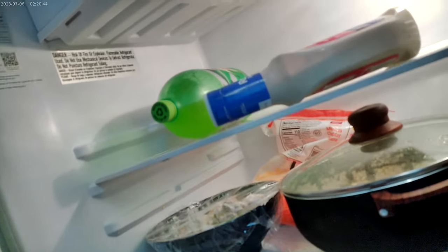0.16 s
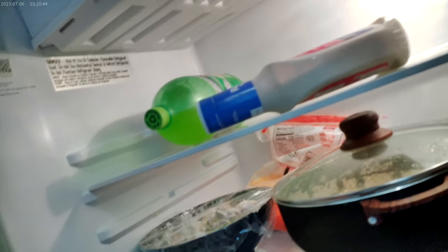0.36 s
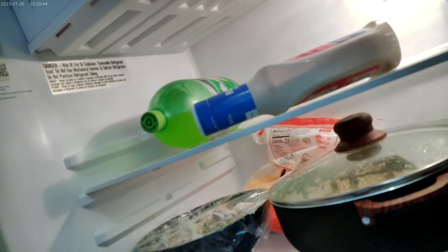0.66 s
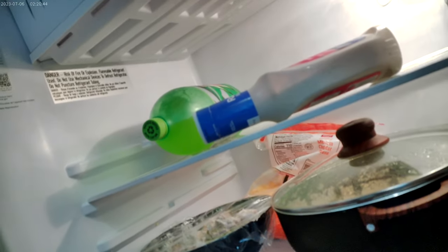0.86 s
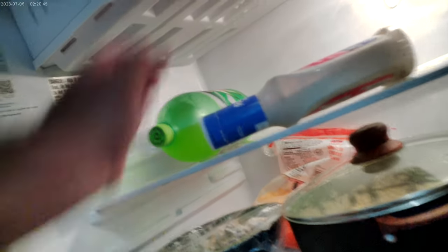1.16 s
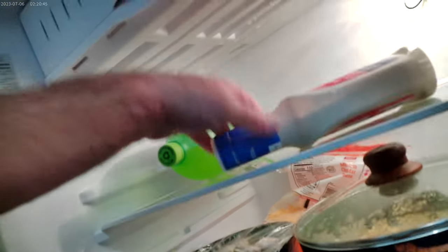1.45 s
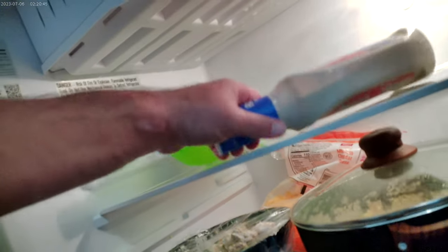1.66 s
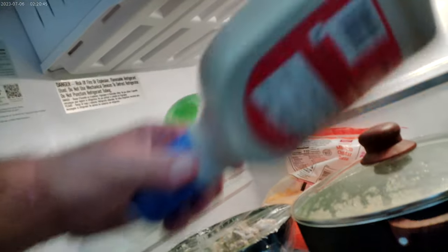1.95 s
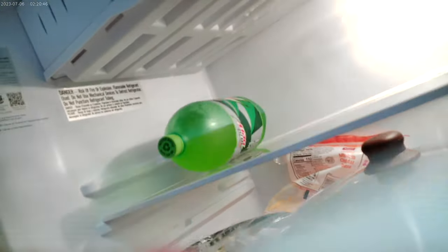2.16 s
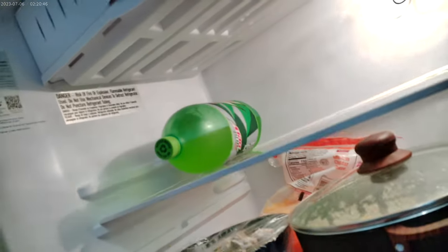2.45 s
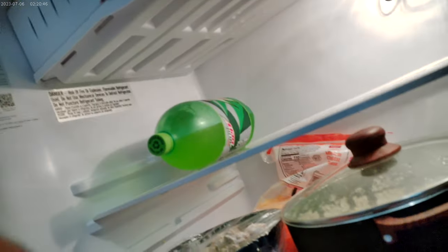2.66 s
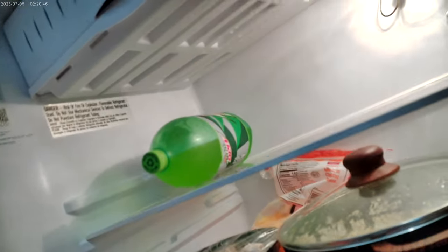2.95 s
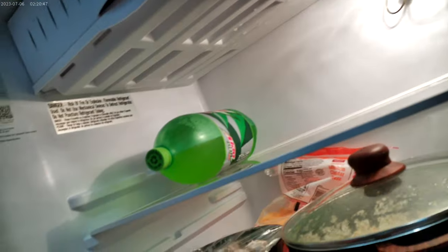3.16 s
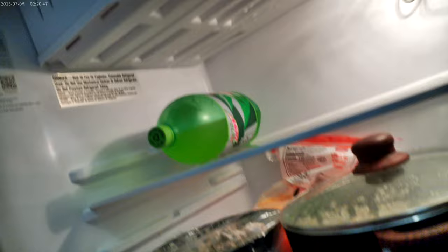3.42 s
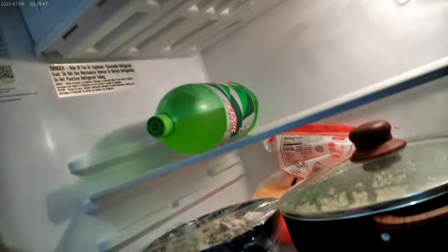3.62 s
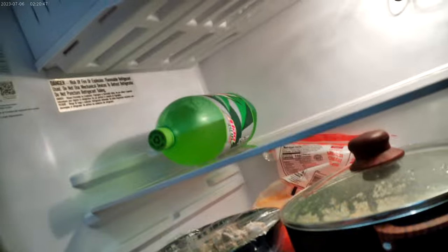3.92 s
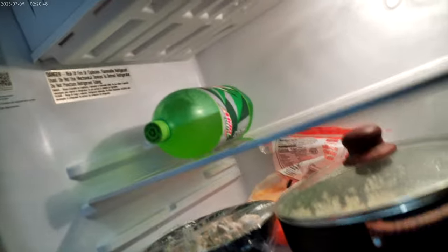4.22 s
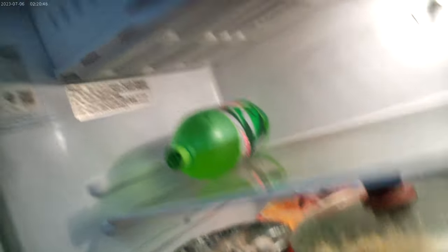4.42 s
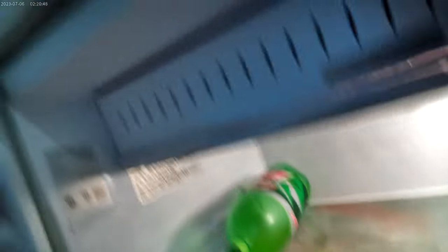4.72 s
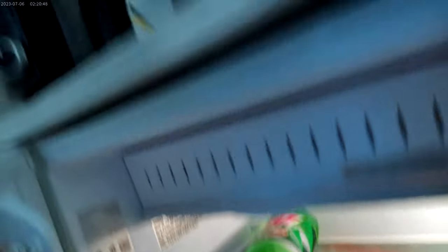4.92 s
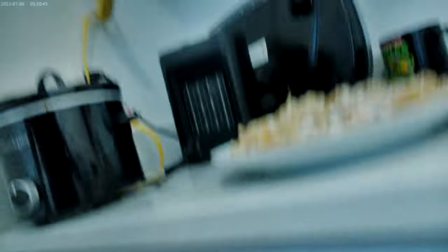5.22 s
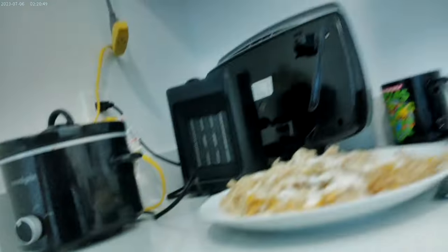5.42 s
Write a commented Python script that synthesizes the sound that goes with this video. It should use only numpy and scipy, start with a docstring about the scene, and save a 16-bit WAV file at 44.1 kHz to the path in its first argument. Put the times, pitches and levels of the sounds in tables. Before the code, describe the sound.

Heard closely from inside an open refrigerator, with a short boxy echo. At 0 s a dull, low bottle knock lands with a brief swell of rumble and fades by about 0.3 s. Very faint taps come near 0.9-1.0 s, and barely audible plastic ticks and a soft touch around 1.8-1.9 s. At 2.6 s a firm hollow clunk breaks the quiet, followed by two quick knocks near 2.9 s. The heaviest blows come at 3.0-3.1 s, thick and bouncing, slightly flattened by the small microphone. Softer thuds follow at 3.45-3.6 s, then rolling bumps at 3.65-3.9 s with low rumble, mid-range rustle and a faint glassy lid chatter. A tight cluster of strong knocks strikes at 4.27-4.35 s, with a faint tap near 4.5 s. After that only low rumble and an almost inaudible wavering hum remain, with one tiny click at the very end, about 5.6 s.

```python
"""Knocks inside an open refrigerator

Bottles knock and bounce on the shelves: bursts of contact force excite damped modes of bottle, shelf and
cabinet walls. A glass pot lid chatters on its metal rim in dense clusters of high modes, and plastic ticks
are bursts in broad bands. Decaying noise gives the echo of cabinet and kitchen; faint filtered noise and
a wavering hum fill the gaps. A small microphone overloads softly on the heaviest blow.
"""
import sys
import numpy as np
from scipy import signal
from scipy.fft import rfft, irfft
from scipy.io import wavfile
from scipy.ndimage import uniform_filter1d

SR = 44100
rng = np.random.default_rng(int(sys.argv[2]) if len(sys.argv) > 2 else 0)


def output_pcm(signal):
    """Save a mono or channel-first signal as 16-bit PCM at the path in sys.argv[1].

    Samples are clipped to [-1, 1] before scaling.
    """
    pcm = np.clip(np.atleast_2d(signal).T, -1, 1) * 32767
    wavfile.write(sys.argv[1], SR, np.round(pcm).astype(np.int16))


N = 246078  # samples in the scene

# Bottle blows. Each row: start in seconds, relative level in dB, bottle pitch in Hz, note in dB, thud pitch
# in Hz, thud in dB, clack in dB, crack in dB, contact time in seconds, mean loss per rebound in dB.
BOTTLE_BLOWS = [(0.002, -15, 215, -6, 203, -3, -8, -45, 0.0073, 14),
                (0.212, -56, 280, -18, 110, 12, -6.5, -47, 0.012, 14),
                (0.88, -35, 773, -9.5, 280, -36, -2.5, -49, 0.0053, 23.5),
                (0.945, -46, 337, -15, 250, -20, -18, -56, 0.027, 2),
                (1.009, -49.5, 830, -9, 230, 2.5, -41, -67, 0.018, 8.5),
                (1.93, -62.5, 455, -9, 150, 6.5, -6, -39, 0.032, 2.5),
                (2.589, -38, 600, -10.5, 143, -7, -30.5, -64, 0.014, 18.5),
                (2.607, -6, 748, -11, 260, -5.5, -20.5, -49.5, 0.0077, 12.5),
                (2.853, -15, 745, -9.5, 125, -14.5, -5.5, -47.5, 0.011, 10),
                (2.877, -19.5, 833, -9.5, 135, -2, -13.5, -46.5, 0.016, 7),
                (3.032, -9, 558, -11.5, 200, -12, -22.5, -44.5, .03, 0.5),
                (3.055, 0, 283, -6.5, 226.7, -3.5, -17.5, -43, 0.017, 6),
                (3.096, -5, 678, -9.5, 165, -10.5, -11, -45, 0.015, 7.5),
                (3.445, -22.5, 800, -18, 213, 4, -29, -61, 0.0086, 17),
                (3.488, -26, 275, -14.5, 196, 3.5, -24.5, -59, .02, 5.5),
                (3.568, -35.5, 860, -7, 207, -8, -16, -62, 0.014, 11),
                (3.665, -13.5, 699, -5, 258, -24.5, -26, -62.5, 0.022, 8.5),
                (3.706, -15, 290, -1, 272, -9.5, -29.5, -68.5, 0.024, 4),
                (3.799, -31.5, 260, -18.5, 90, 3.5, -4, -78, 0.026, 5.5),
                (3.866, -23, 798, -14, 221, -8, -14.5, -58, 0.015, 5.5),
                (4.27, -11, 759, -12.5, 242, -13, -4, -38, 0.011, 10.5),
                (4.287, -8.5, 706, -13.5, 105, -5, -19.5, -57, 0.012, 8),
                (4.321, -18, 753, -15.5, 210, -1, -13, -42, 0.017, 7.5),
                (4.471, -40, 621, -11.5, 200, -8.5, -34, -36.5, 0.01, 15.5),
                (5.565, -51, 755, -11, 245, -33, 1, -45, 0.0052, 26)]
# Lid meeting the rim. Each row: start in seconds, relative level in dB, level of the chatter against it in dB.
LID_TOUCHES = [(3.6674, -25, -27), (3.692, -23, -15), (3.868, -37, -21)]
# Dry plastic ticks. Each row: start in seconds, relative level in dB, favoured pitch in Hz, length in seconds.
PLASTIC_TICKS = [(0.877, -89, 4300, .02), (1.789, -64, 5070, 0.018), (1.846, -70, 5600, 0.007),
                 (3.448, -60, 3180, 0.0065), (3.503, -51, 2050, 0.0046), (4.47, -46, 1700, 0.015),
                 (4.487, -47, 2400, 0.0065)]
# Modes of the shelf, cabinet walls, glass lid and hard plastic edges. Each row: frequency in Hz,
# relative level in dB, nominal 60 dB decay time in seconds, which ring() scales by its damp factor.
SHELF_MODES = [(317, 7.5, 0.47), (410, -4, 0.29), (467, 4, 0.91), (518.2, -2.5, 0.2), (506, -7.5, 0.21),
               (582.4, 8, 0.41), (634, 3.5, 0.27), (795.6, 11.5, 0.34), (870, -2.5, 0.69),
               (1010, -11, 0.41)]
WALL_MODES = [(58, -36.5, 0.32), (76.9, -6, 0.26), (114, -10.5, 0.75), (139, -15, 0.09), (160, 5, 0.13),
              (199.2, 11.5, 0.25), (241.7, 11.5, 0.14), (277.8, -4, 0.2)]
LID_MODES = [(1457, 14.5, 0.092), (1550, -3.5, .15), (2320, -29.5, .2), (2450, -14.5, 0.21),
             (2534, 9.5, 0.092), (2870, 3, 0.11), (3010, -3.5, 0.58), (3276, -3.5, 0.19), (3460, -4, 0.085),
             (4350, -18.5, .2), (4377, 2, 0.18), (4680, 17.5, 0.3), (4670, -1, 0.24), (4775, -1.5, 0.28),
             (4900, -13.5, 0.14)]
EDGE_MODES = [(1030, 2, 0.01), (1397, -1.5, 0.023), (1468.4, -0.5, 0.09), (1580, -4, 0.099),
              (1830, -13, 0.0045), (2100, -11, 0.034)]
# Broad resonances of the ticks. Each row: frequency in Hz, relative level in dB.
TICK_BANDS = [(1600, 2), (2100, -8.5), (3200, -0.5), (4900, -1), (5950, 4)]
# Spectra of crack, rumble and mid-band noise. Each row: frequency in Hz, relative density in dB per Hz.
CRACK_SPECTRUM = [(1000, -33.5), (1700, -13.5), (2420, -28), (2730, -12), (3440, -15.5), (5760, -24),
                  (8590, -46), (11200, -90.5), (18900, -120)]
RUMBLE_SPECTRUM = [(12, -37.5), (20, -5), (69, 5.5), (164, -9), (212, -4.5), (253, -0.5), (318, -8.5),
                   (409, -32.5), (477, -37.5), (680, -45.5), (1070, -58.5), (7760, -58.5), (8590, -68),
                   (11200, -88), (18900, -120)]
MID_NOISE_SPECTRUM = [(250, -36), (420, -8.5), (544, -9), (735, -1), (1000, -12), (1520, -13.5),
                      (2370, -25), (5000, -33), (6500, -54), (11000, -120)]
# Decay of the echo in the cabinet. Each row: frequency in Hz, 60 dB decay time in seconds.
CABINET_T60 = [(60, 0.43), (160, 0.11), (420, 0.21), (1100, 0.21), (2900, 0.047), (7700, 0.16)]
# Mean background levels. Each row: time in seconds, rumble in dB, mid-band noise in dB.
BACKGROUND_LEVELS = [(0, -45.5, -47.5), (.3, -64.5, -82), (.5, -63, -89), (.64, -61, -80),
                     (.78, -65.5, -88), (1.0, -60, -76), (1.25, -64, -93.5), (1.95, -58.5, -82.5),
                     (2.2, -62, -90.5), (2.55, -59, -87), (3.4, -57.5, -85.5), (3.65, -46.5, -61),
                     (4.0, -60.5, -65), (4.3, -57, -74), (4.62, -62.5, -99), (5.2, -65.5, -102),
                     (5.58, -63, -80.5)]

# change at each further rebound: pitch ratio, then dB against the rebound's own level
REBOUND_SAG, REBOUND_THUD_DB, REBOUND_CLACK_DB, REBOUND_CRACK_DB = 0.9, 2, 1.94, 0
REBOUND_CONTACT_S, REBOUND_GAP_S = 0.014, 0.022
RISE_SHARE = 0.25  # build-up of a blow as a share of its contact time
CLINK_S, CHATTER_S, CHATTER_GAP_S, CHATTER_LOSS_DB = 0.009, 0.074, 0.031, 5.5
WALL_SLOPE_DB, TICK_SLOPE_DB = 18, 19  # loss per octave away from the favoured pitch
HUM_HZ, HUM_DB, HISS_DB = 52.6, -78.5, -99  # mean pitch and level of the hum; hiss before the low-pass
OVERLOAD = 0.72  # ceiling of the microphone
TOP_HZ = 8400


def bottles():
    """Modal excitation: each contact force drives bottle, shelf, edges and walls; its noise is the crack."""
    body, walls, crack = np.zeros((3, N))
    for s, db, hz, note_db, thud_hz, thud_db, clack_db, crack_db, length in contacts():
        push = undb(db) * bounces(length, 2.5, RISE_SHARE * length)
        note = ring([(hz, 0, 0.055), (1.55 * hz, -10, 0.03)], 1)
        # shelf and edge modes are detuned at random for each contact
        shelf = ring(SHELF_MODES, 0.15, spread=0.05, count=2)
        clack = ring(EDGE_MODES, 0.96, spread=0.12, count=2)
        # the spot that is hit favours the panels near one pitch
        favoured = [(f, g - WALL_SLOPE_DB * abs(np.log2(f / thud_hz)), t60) for f, g, t60 in WALL_MODES]
        panels = ring(favoured, 0.32)
        add(body, undb(note_db) * strike(push, note), s)
        add(body, undb(-11) * strike(push, shelf), s)
        add(body, undb(clack_db) * strike(push, clack) / 3, s)
        add(walls, undb(thud_db) * strike(push, panels), s)
        add(crack, undb(crack_db) * push, s)
    # soft plastic contacts cannot drive the bodies in the treble
    bodies = band(body, 160, 1900) + undb(-1) * band(walls, 72, 500)
    return bodies, undb(10) * colour(crack, CRACK_SPECTRUM)


def contacts():
    """Inelastic rebound: each blow is followed by three contacts, lower in pitch and on average weaker."""
    chance = rng.standard_normal((len(BOTTLE_BLOWS), 3, 3))
    for blow, luck in zip(BOTTLE_BLOWS, chance):
        s, db, hz, note_db, thud_hz, thud_db, clack_db, crack_db, length, loss_db = blow
        yield s, db, hz, note_db, thud_hz, thud_db, clack_db, crack_db, length
        for k, (late, strong, sharp) in enumerate(luck, start=1):
            at = s + REBOUND_GAP_S * (k + 0.15 * late)
            level_db = db - k * loss_db + 1.2 * strong
            pitch_hz = hz * REBOUND_SAG ** k * (1 + 0.017 * sharp)
            yield (at, level_db, pitch_hz, note_db, thud_hz, thud_db + k * REBOUND_THUD_DB,
                   clack_db + k * REBOUND_CLACK_DB, crack_db + k * REBOUND_CRACK_DB, REBOUND_CONTACT_S)


def lid():
    """Modal density: glass on a metal rim rings clusters of high modes, detuned afresh at each touch."""
    clusters, top = np.zeros((2, N))
    for s, db, chatter_db in LID_TOUCHES:
        touches = [(s, db, CLINK_S)]
        for k in range(4):
            level_db = db + chatter_db - k * CHATTER_LOSS_DB
            touches.append((s + (k + 1) * CHATTER_GAP_S, level_db, CHATTER_S))
        for at, touch_db, length in touches:
            taps = undb(touch_db) * bounces(length, 9, 0.0011)
            add(clusters, strike(taps, ring(LID_MODES, 0.3, spread=0.022, count=4)), at)
            add(top, strike(taps, ring([(6750, 0, 0.04)], 1, spread=0.02, count=3)), at)
    clusters = band(band(clusters, 1400, 4300), 1000, 4400)
    return undb(-9) * clusters + undb(-51.5) * band(top, 5600, 7100)


def ticks():
    """Broad resonance: short noise bursts pass wide bands, which weaken away from the favoured pitch."""
    out = np.zeros(N)
    for s, db, favoured_hz, length in PLASTIC_TICKS:
        burst = undb(db) * bounces(length, 1.6, 0.001)
        for hz, gain_db in TICK_BANDS:
            level_db = gain_db - TICK_SLOPE_DB * abs(np.log2(hz / favoured_hz))
            add(out, undb(level_db) * band(burst, 0.814 * hz, 1.132 * hz), s)
    return undb(10.5) * out


def inside():
    """Reverberation: noise bands decay at their own rates in the hard cabinet, plus a fainter kitchen tail."""
    t, h = np.arange(int(0.8 * SR)) / SR, 0
    for hz in 40 * 2 ** np.arange(0, 8, 0.5):
        sos = signal.butter(2, [hz / 2 ** 0.25, hz * 2 ** 0.25], "band", fs=SR, output="sos")
        cabinet = 1000 ** (-t / at_hz(CABINET_T60, hz))
        kitchen = undb(-31) * 1000 ** (-t / 0.42)
        part = signal.sosfilt(sos, rng.standard_normal(len(t))) * (cabinet + kitchen)
        h = h + part * np.sqrt(hz / np.sum(part ** 2))  # energy in proportion to bandwidth
    h = h * np.minimum(t / 0.01, 1)  # the echo builds up over 10 ms
    return h / np.sqrt(np.sum(h ** 2))


def background():
    """Modulation: low rumble flickers, mid-band noise swells and sinks, a hum wavers in pitch and level."""
    s, rumble_db, mid_db = np.transpose(BACKGROUND_LEVELS)
    t = np.arange(N) / SR
    rumble = colour(rng.standard_normal(N), RUMBLE_SPECTRUM)
    rumble = rumble * undb(np.interp(t, s, rumble_db) + 2.5 * walk(14))
    mid_noise = colour(rng.standard_normal(N), MID_NOISE_SPECTRUM)
    mid_noise = mid_noise * undb(np.interp(t, s, mid_db) + 2 * walk(25))
    hum_level = undb(HUM_DB + 2.5 * walk(9))
    hum_hz = HUM_HZ * (1 + 0.01 * walk(4.5))
    hum = hum_level * np.sin(2 * np.pi * np.cumsum(hum_hz) / SR)
    return rumble + mid_noise + hum


def bounces(length, scatter_db, rise):
    """Contact noise: dense uneven force builds over rise s, under a Gaussian decay of time constant length."""
    t = np.arange(SR // 6) / SR
    chance = rng.standard_normal((2, len(t)))
    unevenness = uniform_filter1d(chance[1], size=36) * 6  # the factor restores unit spread
    grit = chance[0] * undb(scatter_db * unevenness)
    return grit * np.minimum(t / rise, 1) * np.exp(-(t / max(length, 0.002)) ** 2)


def ring(modes, damp, spread=0., count=1):
    """Modal superposition: unit-energy sum of decaying sines, each mode as count detuned neighbours."""
    t = np.arange(SR // 4) / SR
    hz, db, t60 = np.repeat(np.transpose(modes), count, axis=1)[:, :, None]
    hz = hz * (1 + spread * rng.standard_normal(hz.shape))
    decay = np.exp(-np.log(1000) * t / (damp * t60))
    h = np.sum(undb(db) * np.sin(2 * np.pi * hz * t) * decay, axis=0)
    return h / np.sqrt(np.sum(h ** 2))


def strike(push, h):
    """Linear response: a push convolved with a body's impulse response, scaled to the energy of the push."""
    out = signal.fftconvolve(push, h)
    return out * np.sqrt(np.sum(push ** 2) / np.sum(out ** 2))


def through(x, h):
    """Linear response of a space: convolution, cut to the scene."""
    return signal.fftconvolve(x, h)[:N]


def band(x, lo_hz, hi_hz):
    """Band limitation by a steep band-pass."""
    return signal.sosfilt(signal.butter(4, [lo_hz, hi_hz], "band", fs=SR, output="sos"), x)


def colour(x, spectrum):
    """Spectral weighting by a (Hz, dB) table, keeping the power of white noise."""
    gain = undb(at_hz(spectrum, np.arange(len(x) // 2 + 1) * SR / len(x)))
    return irfft(rfft(x) * gain / np.sqrt(np.mean(gain ** 2)), len(x))


def walk(rate):
    """Slow random modulation: values held 1 / rate s, then smoothed twice; spread near 1."""
    k = int(SR / rate)
    held = np.repeat(rng.standard_normal(N // k + 1), k)
    return 1.3 * uniform_filter1d(uniform_filter1d(held, k), k)[:N]


def at_hz(table, hz):
    """Interpolation of a (Hz, value) table on a logarithmic frequency axis."""
    f, v = np.transpose(table)
    return np.interp(np.log(np.maximum(hz, 1)), np.log(f), v)


def undb(db):
    """Amplitude ratio of a level in dB."""
    return 10 ** (np.asarray(db, float) / 20)


def add(track, x, s):
    """Superposition: mix x into track from time s."""
    i = int(max(s, 0) * SR)
    track[i:i + len(x)] += x[:max(N - i, 0)]


def scene():
    """Superposition of direct sound, echo and background; cracks and ticks feed the echo less."""
    bodies, cracks = bottles()
    hits = bodies + lid()
    bright = cracks + ticks()
    echo = through(hits + undb(-4) * bright, inside())
    return (hits + bright + undb(-5.5) * echo + background())[None]


def record(dry):
    """Saturation: the microphone flattens the loudest peaks; a faint steady hiss is added and the top is cut."""
    flattened = np.tanh((np.abs(dry) / OVERLOAD) ** 3) ** (1 / 3)
    loud = OVERLOAD * flattened * np.sign(dry)
    hiss = undb(HISS_DB) * rng.standard_normal(dry.shape)
    return signal.sosfilt(signal.ellip(8, 0.5, 60, TOP_HZ, fs=SR, output="sos"), loud + hiss)


dry = scene()
out = record(dry)
output_pcm(out)
```